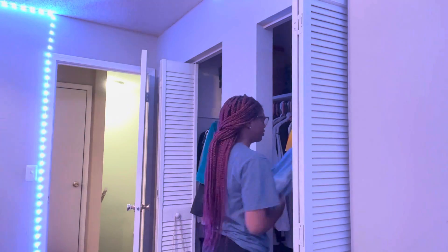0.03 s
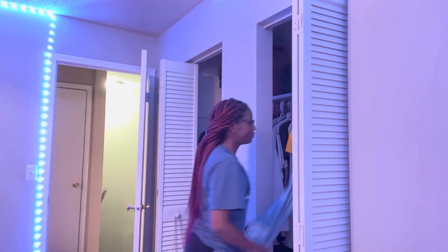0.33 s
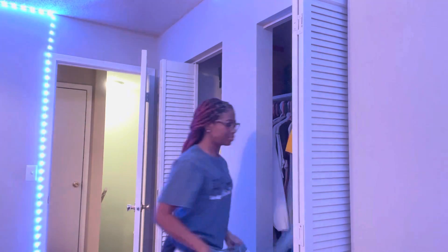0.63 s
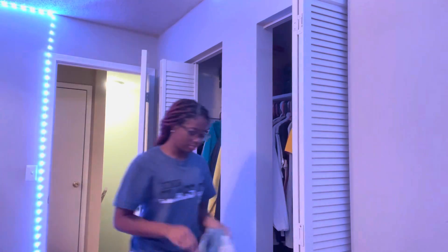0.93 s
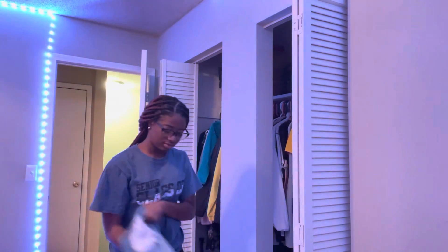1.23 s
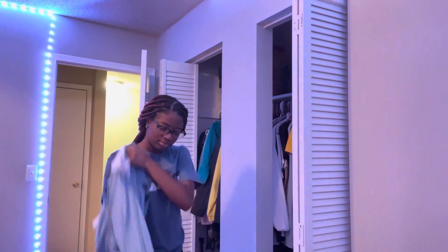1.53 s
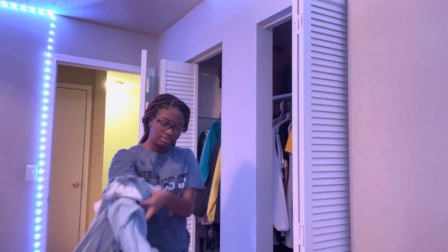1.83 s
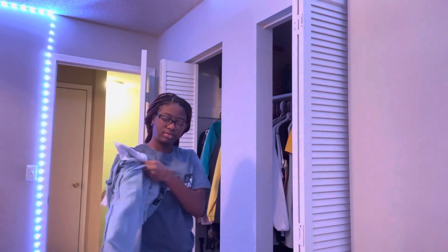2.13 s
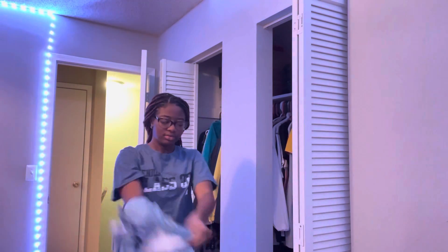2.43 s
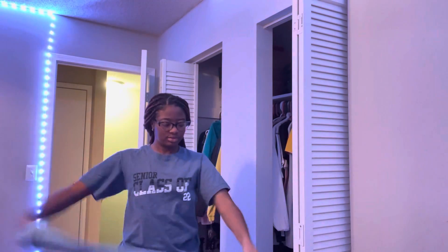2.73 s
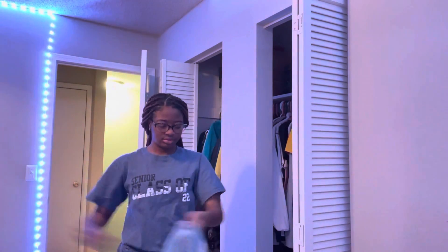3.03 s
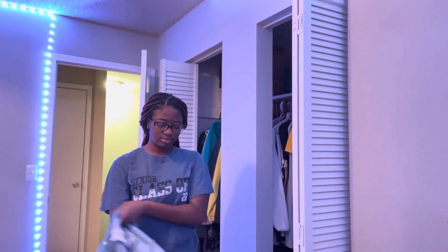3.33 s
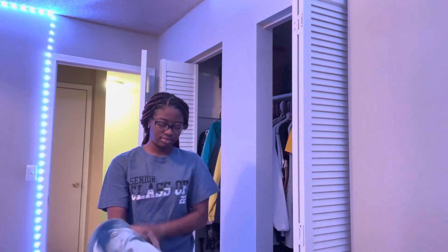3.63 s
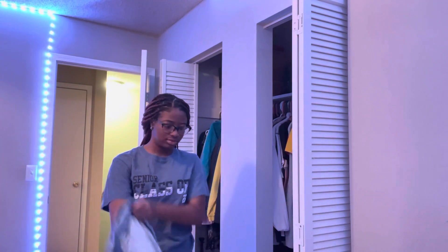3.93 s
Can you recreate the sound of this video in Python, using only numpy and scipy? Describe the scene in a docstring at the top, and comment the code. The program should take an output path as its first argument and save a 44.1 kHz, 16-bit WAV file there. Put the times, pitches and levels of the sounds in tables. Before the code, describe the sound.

Heavy cloth rustling and flapping in a small bedroom, with a sharp hanger click early on.

```python
"""Denim from the closet

A denim garment is pulled from a closet, gathered up, swung open and folded in a small bedroom.
Slipping threads hiss, heavy folds flap, push the air and snap taut with soft pops.
A hanger clicks, buttons and seams tick, and the weight settles with one dull thump.
The room answers briefly over a faint rumble."""
import sys
import numpy as np
from scipy import signal
from scipy.fft import rfft, irfft, next_fast_len
from scipy.io import wavfile
from scipy.ndimage import map_coordinates

SR = 44100
rng = np.random.default_rng(int(sys.argv[2]) if len(sys.argv) > 2 else 0)


def unload_wav(signal):
    """Save mono or channel-first audio to the path in sys.argv[1] as 16-bit WAV at rate SR, clipped to [-1, 1]."""
    wavfile.write(
        sys.argv[1],
        SR,
        np.round(np.clip(np.atleast_2d(signal).T, -1, 1) * 32767).astype(np.int16),
    )


N = 176400
T = np.arange(N) / SR
TOP_HZ = 15500


def handling():
    """Threads slip by the thousand and hiss; the heavier folds flap underneath."""
    # One table a gesture. Each row: time in seconds, then slide, fibre and flap levels in relative dB.
    pull = [(0.0, -64, -68, -55), (0.29, -61, -62, -52), (0.338, -63, -62, -55.5), (0.35, -57, -63.5, -45),
            (0.386, -54.5, -59, -52), (0.444, -61.5, -62, -49), (0.53, -66.5, -75.5, -66)]
    lower = [(.6, -68, -79, -54.5), (.66, -72.5, -79, -67.5), (.72, -73.5, -81, -60.5),
             (.775, -70, -74, -54), (0.799, -56.5, -63.5, -60), (.86, -63.5, -71.5, -43.5),
             (.90, -71, -77, -55), (.94, -80, -79, -57)]
    gather = [(0.97, -74.5, -74.5, -62), (1.038, -68, -73, -63), (1.17, -58.5, -66.5, -56.5),
              (1.28, -58.5, -64, -55.5), (1.38, -60, -62.5, -59.5), (1.474, -60, -64, -51),
              (1.492, -59.5, -62.5, -61), (1.588, -57.5, -66.5, -55), (1.634, -64.5, -70, -64),
              (1.66, -60.5, -71, -56), (1.72, -68, -72.5, -54.5)]
    turn = [(1.76, -69.5, -77, -56.5), (1.816, -62.5, -68.5, -49), (1.93, -64.5, -68.5, -60.5),
            (1.972, -66, -70.5, -50), (2.022, -60, -63.5, -63), (2.078, -57.5, -64, -54),
            (2.174, -70, -75, -57.5), (2.202, -69.5, -69, -90), (2.22, -68, -70.5, -60)]
    swing = [(2.25, -68.5, -71, -55), (2.27, -67.5, -70, -52), (2.368, -61, -69, -59.5),
             (2.44, -56.5, -65.5, -52.5), (2.505, -51.5, -61.5, -45), (2.524, -52, -68, -45.5),
             (2.55, -53, -63.5, -42), (2.59, -55, -62.5, -52), (2.634, -56.5, -59, -46),
             (2.654, -49, -56.5, -45.5), (2.718, -55.5, -57.5, -44.5), (2.792, -51, -62.5, -45),
             (2.83, -59, -64.5, -45), (2.87, -69.5, -74, -66), (2.928, -79, -85.5, -81),
             (3.1, -102, -105, -96)]
    catch = [(3.12, -78, -86, -63), (3.14, -71, -79, -66), (3.16, -68.5, -76, -59),
             (3.25, -63.5, -67.5, -57), (3.305, -55.5, -58.5, -51), (3.398, -62.5, -67.5, -53),
             (3.472, -77, -80.5, -85), (3.49, -66, -75, -73)]
    fold = [(3.51, -71, -69.5, -63), (3.614, -60.5, -68.5, -62), (3.662, -71, -73, -57),
            (3.702, -73, -71, -66.5), (3.814, -72, -70, -70), (3.844, -63.5, -68, -53),
            (3.958, -56, -59, -56), (4.0, -65, -65, -61)]
    # Midrange slide, airy fibres, low flap. Each row: frequency in Hz, relative level in dB.
    slide_eq = [(150, -5), (500, -2), (1000, 5), (1700, 3), (2800, -0.5), (4000, -3.5), (6000, -9.5),
                (8000, -20.5), (11000, -27), (15000, -60)]
    fibre_eq = [(2000, -15.5), (5000, 1.5), (8000, 3), (10500, 3.5), (12500, 2), (14000, -2.5),
                (15000, -43)]
    flap_eq = [(30, -67), (55, -21), (90, -10.5), (140, -1), (230, 1), (420, -0.5), (650, -2.5),
               (900, -6.5), (1400, -18), (3000, -34), (8000, -65)]
    times, *faders = np.transpose([*pull, *lower, *gather, *turn, *swing, *catch, *fold])
    slide_db, fibre_db, flap_db = [np.interp(T, times, fader) for fader in faders]
    grip_db = 1.82 * wobble(45)  # uneven grip shakes both hisses together
    slide = colour(slips(3000, spread_db=2.0) * amp(slide_db + grip_db + 2.0), slide_eq)
    fibres = colour(slips(5000, spread_db=0.5) * amp(fibre_db + grip_db + 1.5), fibre_eq)
    flap = colour(slips(1500, spread_db=2.5) * amp(flap_db + 1.5 * wobble(30.02) - 3.0), flap_eq)
    return slide + fibres + flap


def scrapes():
    """Cloth drags hard over an edge or a seam with a grainy rasp."""
    # Each row: peak time in seconds, half-width in seconds, level in dB.
    drags = [(.14, 0.093, -64.5), (.31, 0.054, -57), (.425, 0.033, -49.5), (.47, 0.0075, -58.5),
             (1.25, 0.054, -74), (1.83, 0.011, -60), (2.70, 0.023, -57), (2.785, 0.0077, -52.5),
             (3.18, 0.017, -66)]
    # The rasp's tone. Each row: frequency in Hz, relative level in dB.
    scrape_eq = [(200, 5), (700, -1.5), (1500, 11.5), (2800, 8.5), (3700, -18), (6000, -1), (10000, -49)]
    return colour(slips(1200, spread_db=2.5) * swells(drags), scrape_eq)


def wafts():
    """The moving garment pushes air in soft, bassy swells."""
    # Each row: peak time in seconds, half-width in seconds, level in dB.
    puffs = [(.07, .012, -60.5), (.23, 0.059, -56), (.44, 0.051, -51.5), (.84, 0.029, -52.5),
             (1.33, 0.029, -62.5), (1.53, 0.011, -55.5), (1.68, 0.0099, -57), (2.53, 0.024, -55),
             (2.62, 0.021, -56.5), (2.72, 0.043, -64), (3.93, 0.024, -59.5)]
    # The air's tone. Each row: frequency in Hz, relative level in dB.
    air_eq = [(25, -25), (42, -1), (55, -6.5), (80, -6.5), (130, -12.5), (190, -8.5), (300, -23),
              (600, -26.5), (2000, -68)]
    return colour(rng.standard_normal(N) * swells(puffs), air_eq)


def brushes():
    """Denim brushes quickly over denim with a bright swish."""
    # Each row: peak time in seconds, half-width in seconds, level in dB.
    strokes = [(.02, 0.044, -71), (.31, 0.035, -61), (.408, 0.0052, -53), (1.27, 0.046, -62),
               (1.824, 0.0062, -59), (1.905, 0.008, -63), (2.08, 0.017, -81)]
    # The swish's tone. Each row: frequency in Hz, relative level in dB.
    brush_eq = [(500, -12), (1800, -3), (2800, 11.5), (4200, -6), (6000, -0.5), (7500, -6), (12000, -8),
                (15000, -66)]
    return colour(slips(2000, spread_db=2.0) * swells(strokes), brush_eq)


def fold_pops():
    """A fold snaps taut: one soft push and a puff of air around its pitch."""
    # Each row: start in seconds, relative level in dB, pitch in Hz.
    pops = [(0.023, -38, 1140), (0.281, -45, 201), (.349, -34, 730), (.357, -39, 555), (0.449, -44, 320),
            (.693, -43.5, 1060), (.755, -44, 690), (1.322, -40, 340), (1.370, -42.5, 338),
            (1.425, -42, 810), (1.490, -39.5, 368), (1.503, -37, 372), (1.525, -46.5, 420),
            (1.655, -42.5, 410), (1.669, -43.5, 840), (1.791, -38, 980), (1.810, -46, 279),
            (1.835, -43, 620), (1.963, -34, 644), (1.9672, -43.5, 337), (1.976, -56, 480),
            (2.257, -42, 650), (2.407, -33.5, 770), (2.413, -41, 710), (2.481, -38, 336),
            (2.514, -30.5, 600), (2.535, -32, 446), (2.560, -31.5, 443), (2.570, -37, 560),
            (2.622, -29, 690), (2.695, -49, 260), (2.719, -25.5, 645), (2.731, -37.5, 530),
            (2.764, -38.5, 248), (2.788, -34, 427), (2.815, -30.5, 340), (2.824, -31.5, 685),
            (2.835, -32.5, 490), (2.959, -42.5, 494), (2.967, -54, 590), (2.979, -52.5, 486),
            (3.004, -54, 434), (3.129, -57, 900), (3.138, -39, 1220), (3.163, -62, 445), (3.257, -43, 475),
            (3.505, -53, 800), (3.515, -46.5, 646), (3.522, -44, 510), (3.533, -48.5, 400),
            (3.840, -45, 435), (3.856, -42.5, 560), (3.863, -44.5, 328)]
    puff_decay_s, soften_hz = 0.015, 1640  # soft cloth cannot make a sharp snap
    out, t = np.zeros(N + SR), np.arange(SR // 10) / SR
    for start, db, hz in pops:
        band = signal.butter(2, [hz / 1.8, min(hz * 1.37, 8000)], "band", fs=SR)
        puff = unit(signal.lfilter(*band, rng.standard_normal(len(t)))) * np.exp(-t / puff_decay_s)
        body = push(t, hz, decay_cycles=0.96, rise_s=0.00052)
        out[round(start * SR):][:len(t)] += amp(db - 2.5) * (1.72 * body + 0.3 * puff)
    return signal.lfilter(*signal.butter(3, soften_hz, fs=SR), out[:N])


def thump():
    """A dull knock and a few low contacts as the weight settles."""
    # Each row: start in seconds, relative level in dB, pitch in Hz.
    landings = [(.790, -35, 290), (.798, -30.5, 340), (0.807, -31.5, 430), (.823, -36.5, 226),
                (0.837, -47, 250), (0.853, -33.5, 290), (0.860, -37, 140), (.885, -40, 145)]
    # The knock's dull tone. Each row: frequency in Hz, relative level in dB.
    knock_eq = [(100, -9), (300, 8), (600, -3.5), (1000, -1.5), (1700, -6.5), (2400, -20.5), (6000, -33),
                (14000, -47)]
    knock_start_s, knock_rise_s, low_cut_hz = 0.785, 0.01, 83.5
    out, t = np.zeros(N + SR), np.arange(SR // 5) / SR
    for start, db, hz in landings:
        out[round(start * SR):][:len(t)] += amp(db + 4) * push(t, hz, decay_cycles=1.27, rise_s=0.0015)
    contacts = signal.lfilter(*signal.butter(2, low_cut_hz, "high", fs=SR), out[:N])
    attack = np.clip((T - knock_start_s) / knock_rise_s, 0, 1)
    knock = colour(burst(knock_start_s, decay_s=0.015) * attack, knock_eq)
    return contacts + amp(-33) * knock


def hanger():
    """The hanger snaps and rattles briefly; its bending waves deliver the treble first."""
    # Each row: start in seconds, level in dB.
    clicks = [(0.5438, -15), (0.6636, -36)]
    # The hanger's bright tone. Each row: frequency in Hz, relative level in dB.
    hanger_eq = [(300, -30), (1200, -3.5), (2000, -2.5), (3200, 1.5), (4300, 1.5), (5950, 4.5), (7400, 6.5),
                 (9000, 5.5), (10700, 3), (12600, 7), (13800, -4), (14500, -34)]
    bass_lag_s = 0.002
    snap = filtered(impulses(clicks),
                    lambda hz: np.exp(-2j * np.pi * bass_lag_s * hz * (1 - hz / (2 * TOP_HZ))))
    rattle = sum(amp(db - 43) * burst(start, decay_s=0.012) for start, db in clicks)
    return colour(snap + rattle, hanger_eq)


def button_ticks():
    """Buttons and seams make small, sharp contacts."""
    # Each row: start in seconds, level in dB.
    ticks = [(.169, -35), (1.273, -30), (2.515, -25), (2.650, -17), (3.293, -29), (3.825, -36),
             (3.839, -32)]
    # The tick's tone. Each row: frequency in Hz, relative level in dB.
    tick_eq = [(300, -2.5), (1500, 7.5), (3000, -8), (6000, 0), (11000, -5.5), (13500, -9), (15000, -18)]
    return colour(impulses(ticks), tick_eq)


def room(x, wet_db):
    """The bedroom's short tail: wet_db against the direct sound in the mid, tail alone in the side."""
    # Each row: frequency in Hz, seconds to die away by 60 dB.
    decay_times = [(100, 0.43), (400, 0.27), (1500, 0.2), (5000, 0.32), (12000, 0.2)]
    hz, t, spectrum = signal.stft(rng.standard_normal((2, SR // 2)), SR, nperseg=256)
    decay = amp(-60 * t / along(decay_times, hz)[:, None])
    response = signal.istft(spectrum * decay, SR, nperseg=256)[1]
    response[:, :SR // 500] = 0  # 2 ms pre-delay
    response /= np.linalg.norm(response, axis=1, keepdims=True)
    response[0] *= amp(wet_db)
    response[0, 0] = 1  # direct sound
    response[0] /= np.linalg.norm(response[0])
    return signal.fftconvolve(x[None], response, axes=1)[:, :N]


def room_tone_and_width(hz):
    """Mid and side response: the room resonates; bass is narrow, mids and most treble wide."""
    # Room modes. Each row: centre in Hz, bandwidth in Hz, added linear gain.
    modes = [(435, 35, 0.51), (609, 27, 0.69), (903, 13, 0.23)]
    # Stereo width. Each row: frequency in Hz, side gain over mid in dB.
    width = [(40, -8.5), (130, -13), (260, -12.5), (500, -.5), (1200, -2), (4000, -2), (6500, -0.5),
             (8000, 17), (10500, -10.5), (13000, -2.5)]
    resonance = 1 + sum(lift * 1j * hz * band / (centre ** 2 - hz ** 2 + 1j * hz * band)
                        for centre, band, lift in modes)
    side = amp(along(width, hz))
    equal_power = np.sqrt(2 / (1 + side ** 2))
    return resonance * np.array([np.ones_like(side), side]) * equal_power


def rumble():
    """The steady low background of the house, as mid and side."""
    # Each row: frequency in Hz, relative level in dB.
    rumble_eq = [(20, -34), (35, -21), (55, -1), (70, 2.5), (95, -8), (140, -11), (250, -21), (600, -26),
                 (2000, -33), (6000, -36), (13000, -37), (15000, -54)]
    bed = filtered(rng.standard_normal((2, N)), lambda hz: amp(along(rumble_eq, hz)))
    return amp(-69) * unit(bed)


def amp(db):
    """Decibels to gain."""
    return 10 ** (np.asarray(db) / 20)


def unit(x):
    """Scale to rms 1."""
    return x / np.sqrt(np.mean(x ** 2) + 1e-20)


def along(points, hz):
    """Read a curve of (Hz, value) points on a log frequency axis."""
    freqs, values = np.transpose(points)
    return np.interp(np.log(hz + 1), np.log(freqs + 1), values)


def filtered(x, response):
    """Filter x by a response given as a function of frequency."""
    size = next_fast_len(N + SR // 2)
    return irfft(rfft(x, size) * response(np.fft.rfftfreq(size, 1 / SR)), size)[..., :N]


def colour(x, eq, size=8192):
    """Shape x with a causal, unit-energy filter that follows the EQ curve."""
    cepstrum = irfft(np.log(amp(along(eq, np.fft.rfftfreq(size, 1 / SR)))))
    cepstrum[1:size // 2] *= 2  # minimum phase: nothing rings ahead of an attack
    cepstrum[size // 2 + 1:] = 0
    kernel = irfft(np.exp(rfft(cepstrum)))
    return signal.fftconvolve(x, kernel / np.linalg.norm(kernel))[:N]


def wobble(rate):
    """A smooth random curve, rate knots a second."""
    return map_coordinates(rng.standard_normal(4000), [T * rate], mode="mirror")


def slips(rate, spread_db):
    """Tiny random impulses of uneven size, about rate a second, at rms 1."""
    hits = rng.random(N) < rate / SR
    sign = np.sign(rng.standard_normal(N))
    size = amp(spread_db * np.clip(rng.standard_normal(N), -2, 2))
    return unit(hits * sign * size)


def swells(rows):
    """A gain with one bell-shaped swell a row; the half-width is its standard deviation."""
    return sum(amp(db) * np.exp(-.5 * ((T - peak) / half_width) ** 2) for peak, half_width, db in rows)


def impulses(rows):
    """One sharp contact a row."""
    out = np.zeros(N)
    for start, db in rows:
        out[round(start * SR)] = amp(db)
    return out


def burst(start, decay_s):
    """Noise that starts abruptly and dies away."""
    return (T >= start) * np.exp(-np.abs(T - start) / decay_s) * rng.standard_normal(N)


def push(t, hz, decay_cycles, rise_s):
    """A heavily damped swing with a rounded attack."""
    return np.sin(2 * np.pi * hz * t) * np.exp(-t * hz / decay_cycles) * (1 - np.exp(-t / rise_s))


def scene():
    """Garment and hanger in the bedroom over the house rumble, as left and right."""
    mix = room(handling() + scrapes() + wafts() + brushes(), wet_db=-6.0)
    mix += room(fold_pops(), wet_db=-6.0)
    mix += room(thump(), wet_db=-11.0)
    mix += room(hanger(), wet_db=2.5)
    mix += room(button_ticks(), wet_db=3.5)
    mid, side = filtered(mix + rumble(), room_tone_and_width)
    left_db, right_db = -1.89, -0.61
    return np.array([mid + side, mid - side]) * amp([[left_db], [right_db]])


def record(dry):
    """A brick-wall low-pass takes off the very top."""
    return filtered(dry, lambda hz: hz < TOP_HZ)


dry = scene()
out = record(dry)
unload_wav(out)
```